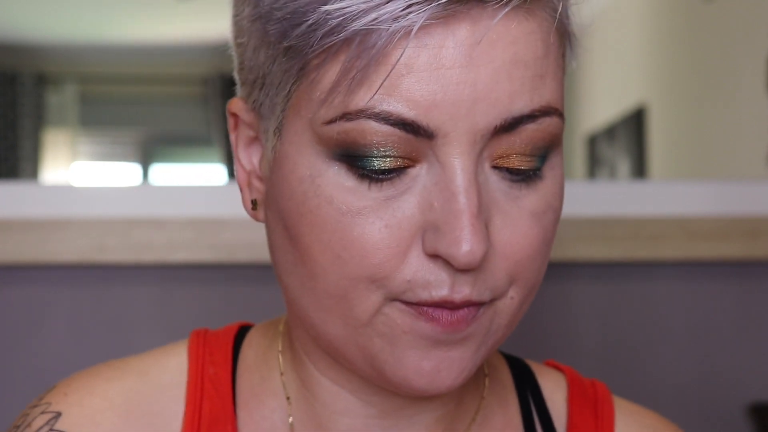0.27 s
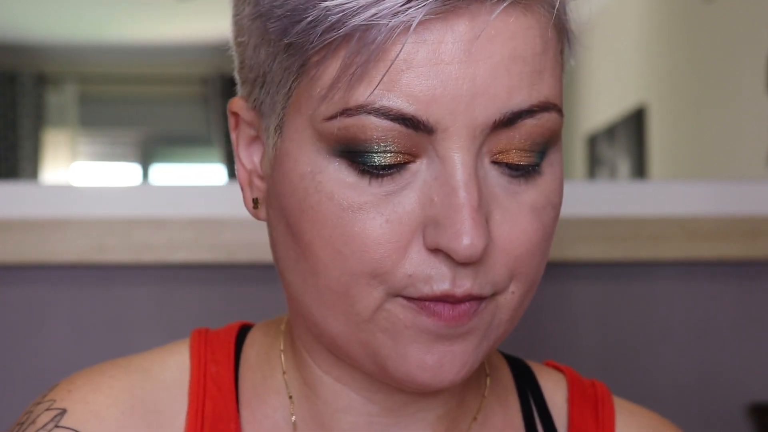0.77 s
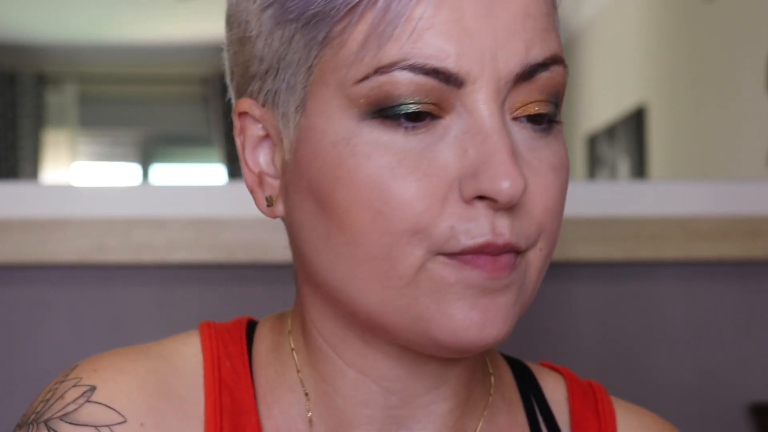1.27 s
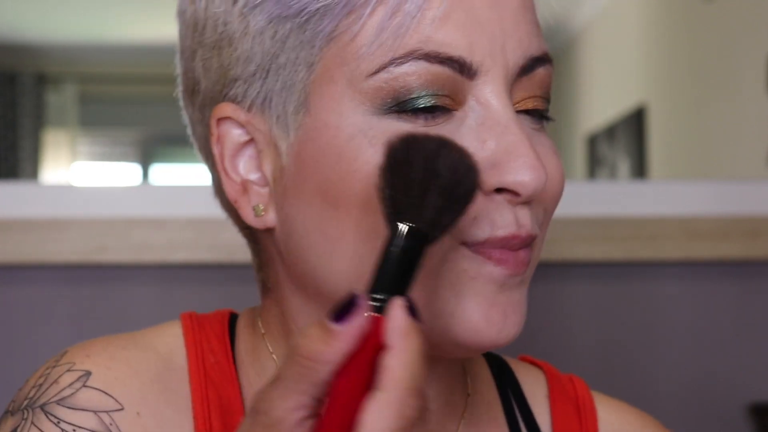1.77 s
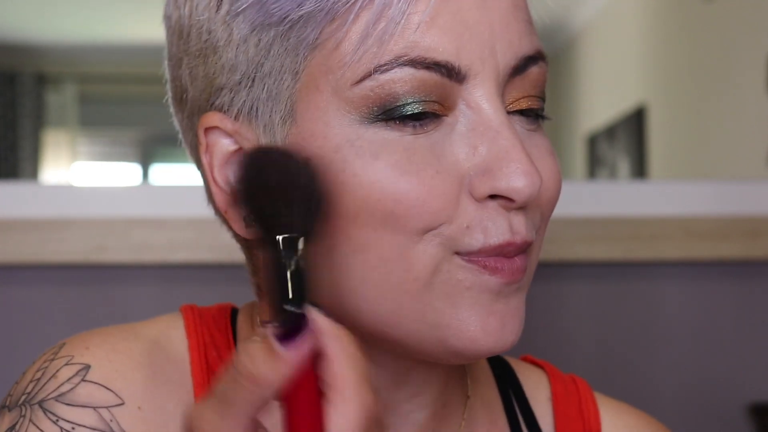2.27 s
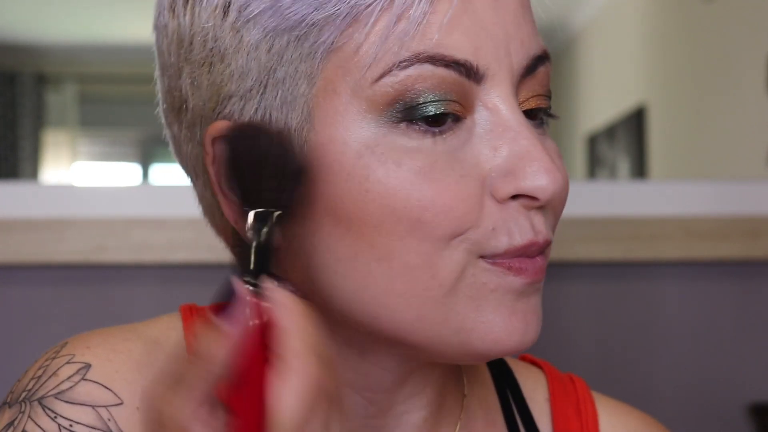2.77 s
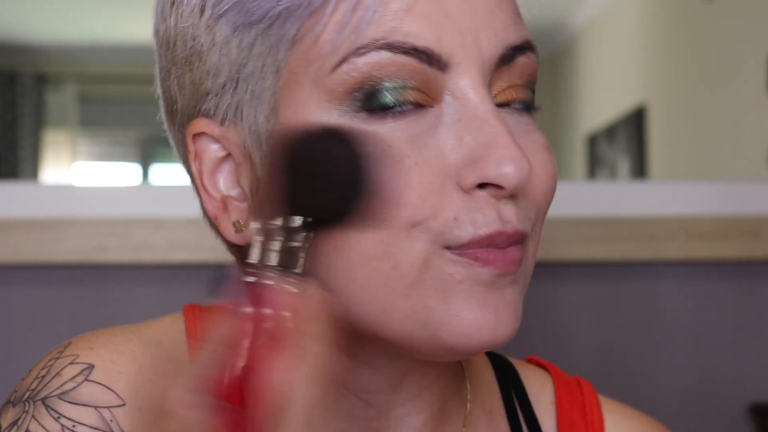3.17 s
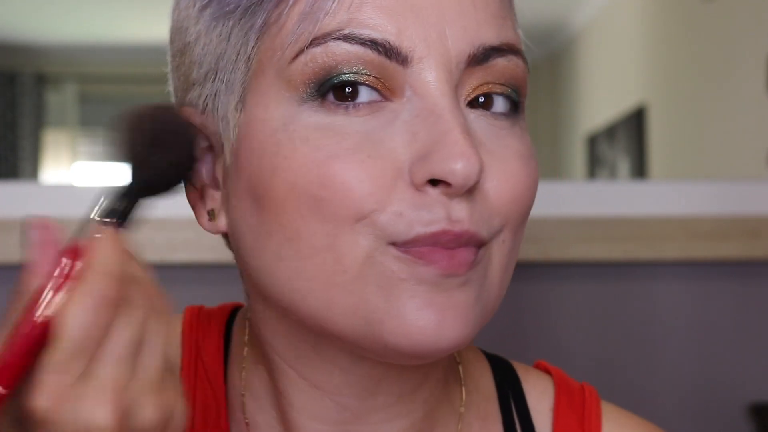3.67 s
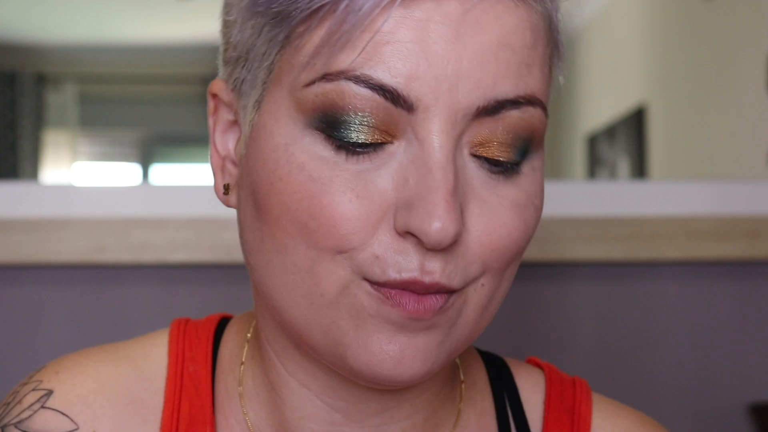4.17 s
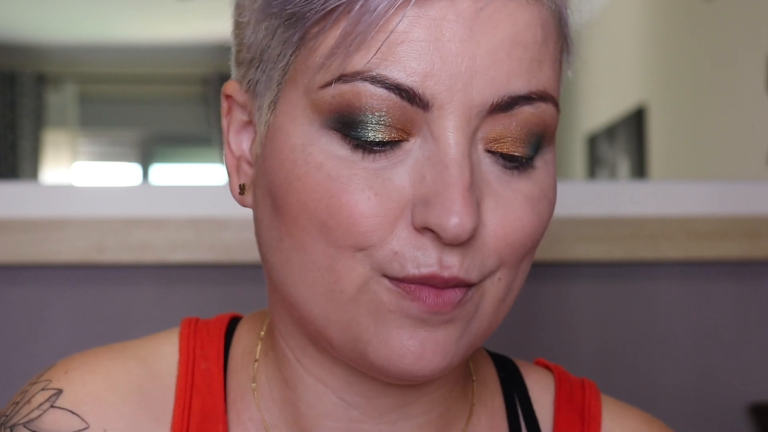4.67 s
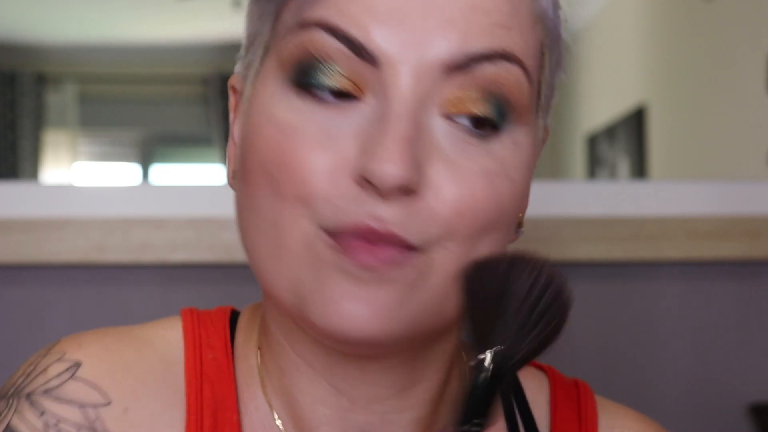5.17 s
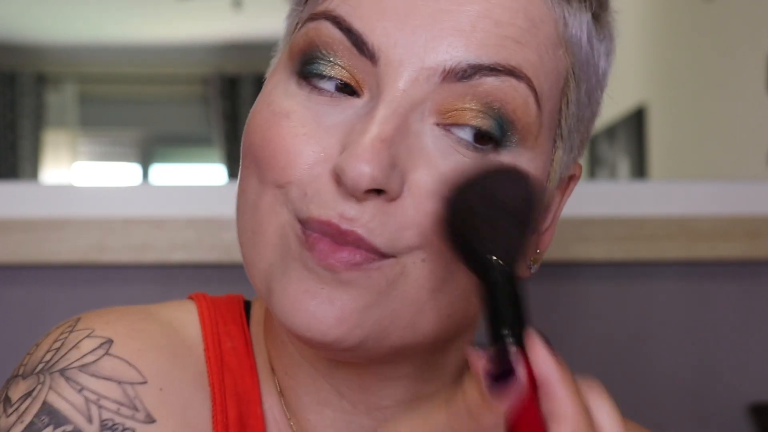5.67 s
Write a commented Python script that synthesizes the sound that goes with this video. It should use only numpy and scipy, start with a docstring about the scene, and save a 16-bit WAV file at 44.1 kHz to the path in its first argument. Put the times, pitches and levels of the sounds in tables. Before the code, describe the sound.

A make-up brush swirls faintly, is knocked twice hard on its case, then strokes a cheek while sparrows chirp outdoors over low distant engine hum.

```python
"""Under quiet room hiss, an engine hums far off; sparrows chirp outside and a make-up brush swirls in powder.
The brush is rapped twice on its hard case, then swept softly over a cheek, close to one microphone.
Hum, ringing case and birds are sums of sines; brush, rumble, street wash and echoes are shaped noise.
The two raps overload the recorder, whose limiter ducks and lets the room's echo swell back."""
import sys
import numpy as np
from scipy import signal
from scipy.fft import rfft, irfft, next_fast_len
from scipy.io import wavfile
from scipy.ndimage import map_coordinates

SR = 44100
rng = np.random.default_rng(int(sys.argv[2]) if len(sys.argv) > 2 else 0)


def store_pcm(level_fs):
    """Save levels as 16-bit WAV."""
    pcm = np.round(np.clip(level_fs, -1, 1) * 32767).astype(np.int16)
    wavfile.write(sys.argv[1], SR, np.atleast_2d(pcm).T)


N = 260631


def amp(db):
    """Turn decibels into a gain."""
    return 10 ** (np.asarray(db) / 20)


def unit(x):
    """Scale to an rms of 1."""
    return x / np.sqrt(np.mean(x ** 2) + 1e-20)


def along(points, hz):
    """Read a curve of (Hz, value) points at any frequency, with frequency on a log axis."""
    f, v = np.transpose(points)
    return np.interp(np.log(hz + 1), np.log(f + 1), v)


def wobble(rate, n):
    """Draw a smooth random curve of n samples through `rate` random points a second."""
    knots = rng.standard_normal(int(n * rate / SR) + 4)
    return map_coordinates(knots, [np.arange(n) * rate / SR])


def filtered(x, response):
    """Colour x by multiplying its spectrum with a gain for each frequency."""
    n = x.shape[-1]
    m = next_fast_len(n + 8192)  # silence added at the end, so that little wraps round
    spectrum = rfft(x, m) * response(np.fft.rfftfreq(m, 1 / SR))
    return irfft(spectrum, m)[..., :n]


def add(track, s, sound):
    """Mix a sound into a track from time s."""
    i = max(round(s * SR), 0)
    part = track[i:i + len(sound)]
    part += sound[:len(part)]


def air():
    """Steady noise gives rumble and microphone hiss; a wash of street noise swells as a car goes by."""
    # colour of the steady noise, relative: f/Hz, level/dB per Hz
    floor_colour = [(12, -53), (20, -2), (44, -1.5), (76, -15), (171, -4.5), (208, -12.5), (260, -5.5),
                    (308, -12), (568, -17.5), (730, -16), (2780, -25.5), (3380, -21), (5440, -22.5),
                    (5910, -27), (15700, -35)]
    floor = unit(filtered(rng.standard_normal(N), lambda hz: amp(along(floor_colour, hz))))
    # colour of the street noise, relative: f/Hz, level/dB
    street = [(300, -61), (480, 2.5), (600, 5), (700, -1.5), (1000, -7.0), (1500, -7.5), (2200, -42)]
    wash = unit(filtered(rng.standard_normal(N), lambda hz: amp(along(street, hz))))
    nearest_s, spread_s, lift_db = 2.76, 0.61, 2  # the passing car
    car_db = lift_db / (1 + ((np.arange(N) / SR - nearest_s) / spread_s) ** 2)
    waver_db = 1.5 * wobble(5, N)
    return amp(-48.5) * floor + amp(-57 + car_db + waver_db) * wash


def traffic():
    """A far engine's firing pulses make multiples of one rate, slowing at last; drones come and go."""
    # distant engine: t/s, firing rate f/Hz, lowest order level/dB, upper orders level/dB
    engine = [(0.0, 25.42, -49, -56), (0.532, 26.38, -56, -55.5), (0.692, 26.32, -53, -58),
              (1.1, 26.66, -50, -67), (1.5, 25.7, -47, -52.5), (1.68, 25.81, -58.5, -54.5),
              (2.78, 26.3, -55.5, -74.5), (3.06, 26.1, -65, -66), (3.54, 26.2, -57.5, -68),
              (4.45, 25.8, -52, -58), (5.01, 25.93, -48.5, -57), (5.26, 25.03, -53.5, -57.5),
              (5.76, 23.4, -47, -67), (5.91, 21.4, -63, -79)]
    # strength of each multiple of the firing rate: multiple, level/dB added to the one above
    orders = [(2, -1.5), (3, -2.5), (4, -1), (7, -6), (9, -6)]
    # swells of traffic drone: middle t/s, length t/s, f/Hz, level/dB at the middle
    drones = [(0.2, 1.1, 161, -56.5), (0.7, 0.75, 181.8, -57), (1.068, 0.69, 132.1, -52.5),
              (1.206, 1.1, 267.8, -58), (2.6, 0.84, 267.2, -58.5), (2.86, 1.17, 160.6, -53.5),
              (2.949, 0.8, 135, -60.5), (3.51, 1.1, 263, -55), (5.2, 1.85, 30.8, -48.5)]
    t = np.arange(N) / SR
    times, rates, low_db, upper_db = np.transpose(engine)
    rate_hz = np.interp(t, times, rates) + 0.14 * wobble(5.7, N)
    turn = 2 * np.pi * np.cumsum(rate_hz) / SR
    hum = np.zeros(N)
    for k, db in orders:
        drift_db = np.interp(t, times, upper_db if k > 2 else low_db)
        hum += amp(db + drift_db + 0.91 * wobble(2.95, N)) * np.cos(k * turn)
    out = np.sqrt(2) * hum  # so that levels are rms
    for s, length, hz, db in drones:
        start = max(s - length / 2, 0)
        n = int((s + length / 2 - start) * SR)
        u = start + np.arange(n) / SR
        swell = amp(db + 0.7 * wobble(6.2, n)) * np.cos(np.pi * (u - s) / length)
        tone = np.sin(2 * np.pi * hz * u + 0.5 * wobble(3.35, n))
        add(out, start, np.sqrt(2) * swell * tone)
    return out


def whistle(length, start_hz, end_hz, rough, taper):
    """A gliding sine of rms 1; short falling ones drop fast and level off, rough ones flutter more."""
    n = int(length * SR)
    u = np.arange(n) / n
    quick_fall = end_hz < start_hz and length < 0.06
    glide = 1 - (1 - u) ** 1.703 if quick_fall else u
    pitch = start_hz + (end_hz - start_hz) * glide + rough * 450 * wobble(900, n)
    swell = signal.windows.tukey(n, taper) * amp((1.5 + 0.64 * rough) * wobble(284, n))
    return unit(swell * np.sin(2 * np.pi * np.cumsum(pitch) / SR))


def chirp(s, db, lead_db, high_db, fall_db, high_ratio, top_ratio, before, after):
    """A sparrow's chirp is a run of quick glides; a facing wall sends its loud arch back twice."""
    # The four parts share their columns: t/s from the start of the arch, length t/s, start f/Hz, end f/Hz,
    # level/dB, roughness 0-1. Each chirp then changes times, pitches and levels.
    lead_in = [(-0.117, 0.0254, 3310, 3590, -16.5, 0.12), (-0.094, 0.0227, 3650, 3875, -8.5, 0.08),
               (-0.079, 0.0135, 3755, 5320, -9, 0.34)]  # swings up
    high_notes = [(-0.069, 0.036, 5240, 5380, -9, 0.29), (0.032, 0.0254, 5440, 5470, -13.5, 0.12)]  # one before the arch, one last of all
    drop = [(-0.043, 0.025, 5800, 3200, -6, 0.13)]  # a steep fall into the arch
    arch = [(0.001, 0.025, 3335, 4252, 0, 0.21), (0.026, 0.018, 4173, 3220, -2, 0.076)]  # the loud rise and fall
    slap_s, slap_db, slap_loss_db = 0.105, -11, 6  # wall: delay per trip, first level, loss on the next
    slap_blur = 0.085  # roughness gained on each trip
    notes = []
    for part, lift_db, ratio in (lead_in, lead_db, 1), (high_notes, high_db, high_ratio), (drop, 0, 1):
        for offset, length, start_hz, end_hz, level, rough in part:
            stretch = before if offset < 0 else after
            glide = (start_hz * ratio, end_hz * ratio)
            notes.append((s + offset * stretch, length * stretch, *glide, db + lift_db + level, rough))
    for offset, length, start_hz, end_hz, level, rough in arch:
        rising = end_hz > start_hz
        glide = (start_hz, end_hz * top_ratio) if rising else (start_hz * top_ratio, end_hz)
        note_db = db + level + (0 if rising else fall_db)
        for trip, wall_db in enumerate([0, slap_db, slap_db - slap_loss_db]):
            start = s + offset * after + trip * slap_s
            notes.append((start, length * after, *glide, note_db + wall_db, rough + trip * slap_blur))
    return notes


def syllables():
    """List every bird note as (s, length s, start Hz, end Hz, dB, roughness), before outdoor colouring."""
    # chirps: arch t/s, level/dB, lead-in lift level/dB, high notes lift level/dB, arch's fall lift level/dB,
    # pitch ratio of the high notes, pitch ratio of the arch's top, time stretch before the arch,
    # time stretch from the arch on
    calls = [(0.122, -53, 0, 6, -2, 1.01, 0.85, 0.75, 0.79),
             (0.462, -38.5, -2, -4.5, -2.5, 1, 1.03, 1.05, 0.95),
             (2.006, -41, 1, 3, -0.5, 1.015, 0.97, 0.97, 1.26),
             (2.443, -37.5, -2.5, -3.5, 0, 1, 1.02, 1.18, 1.05),
             (2.939, -52.5, -3, 6, 2.5, 1.01, 0.93, 0.96, 0.85),
             (4.228, -52, -13, 6, 2, 0.97, 0.99, 0.95, 1.05),
             (4.893, -40.5, 0.5, 4, -7, 0.955, 0.96, 0.86, 1.15),
             (5.55, -56.5, -11, 8.5, 1, 1.03, 0.97, 0.75, 1)]
    # thin whistles of a farther bird, all creeping upward: t/s, length t/s, start f/Hz, level/dB
    thin_notes = [(1.505, 0.025, 5480, -52.5), (1.687, 0.19, 5490, -67), (2.095, 0.047, 5580, -54),
                  (2.219, 0.12, 5920, -65), (2.928, 0.25, 5760, -66.5), (3.323, 0.12, 5670, -62),
                  (3.841, 0.048, 4970, -57), (5.648, 0.039, 5385, -60)]
    thin_rise_hz_per_s, thin_rough = 1400, 0.303
    # harsh scolding notes: t/s, length t/s, start f/Hz, end f/Hz, level/dB
    rasps = [(3.133, 0.135, 4710, 3124, -52), (3.387, 0.08, 4070, 4550, -58.5),
             (3.884, 0.1, 3875, 4670, -57.5), (5.86, 0.066, 4840, 4550, -51)]
    rasp_rough = 0.68
    notes = [note for row in calls for note in chirp(*row)]
    for s, length, hz, db in thin_notes:
        notes.append((s, length, hz, hz + thin_rise_hz_per_s * length, db, thin_rough))
    return notes + [(*rasp, rasp_rough) for rasp in rasps]


def echo(x, build_s):
    """Diffuse echo as fading noise: it builds up, then each frequency dies at its own speed."""
    # time to die away by 60 dB: f/Hz, t/s
    decay = [(200, 0.54), (1500, 0.47), (4200, 0.6), (8400, 0.42), (14000, 0.38)]
    hz, t, z = signal.stft(rng.standard_normal(int(SR * 0.7)), SR, nperseg=256)
    shape = amp(-60 * t / along(decay, hz)[:, None]) * (1 - np.exp(-t / build_s))
    tail = signal.istft(z * shape, SR, nperseg=256)[1]
    return signal.fftconvolve(x, tail / np.linalg.norm(tail))[:len(x)]


def sparrows():
    """Notes come clear through the window gap, and again as a blurred, brighter wash from walls outside."""
    song, scattered = np.zeros(N), np.zeros(N)
    for s, length, start_hz, end_hz, db, rough in syllables():
        blur = 0.5 * abs(np.log(end_hz / start_hz))  # wide glides blur most
        add(song, s, amp(db) * whistle(length, start_hz, end_hz, rough, taper=0.48))
        add(scattered, s, amp(db) * whistle(length, start_hz, end_hz, rough + blur, taper=0.071))
    # colouring by each path: f/Hz, level/dB
    gap = [(2900, 4), (3250, -2.0), (3550, 4.0), (3850, 1.5), (4400, -7), (5000, 0.0), (5400, 1.5), (6300, 0)]
    walls = [(2600, -0.5), (3200, -1), (3700, -3), (4500, 1.5), (5400, 0.5), (6500, 8.5)]
    direct = filtered(song, lambda hz: amp(along(gap, hz)))
    wash = echo(filtered(scattered, lambda hz: amp(along(walls, hz))), build_s=0.0029)
    return direct + wash


def strokes():
    """The hand keeps an even beat through each run: list (middle s, half length s, dB, bright Hz)."""
    # runs of strokes: middle of the first t/s, middle of the last t/s, half a stroke's length t/s,
    # level/dB of the first before its swell, bright region f/Hz
    brushing = [(0.40, 0.80, 0.1, -54, 11100), (1.96, 1.965, 0.14, -56, 11400),
                (2.27, 3.95, 0.125, -58.5, 11620), (4.437, 4.85, 0.091, -59, 10600),
                (5.235, 5.234, 0.13, -55.5, 8400), (5.588, 5.849, 0.14, -54, 10700)]
    period_s = 0.24  # nearest beat that fits the run
    fade_db = 0.1  # each stroke of a run is a little lighter
    beats = []
    for first, last, half_s, db, bright_hz in brushing:
        count = round(abs(last - first) / period_s) + 1
        for k, s in enumerate(np.linspace(first, last, count)):
            beats.append((s, half_s, db - k * fade_db, bright_hz))
    return beats


def brush():
    """Slipping bristles are flickering noise: a fine, broad hiss that swells and fades with each sweep."""
    hiss = np.zeros(N)
    for s, half_s, db, bright_hz in strokes():
        n = int(2 * half_s * SR)
        slips = rng.standard_normal(n) * amp(2.0 * wobble(310, n))
        # f/Hz, level/dB
        colour = [(1000, -15), (bright_hz * 0.85, -8), (bright_hz, 0),
                  (bright_hz * 0.96, -1), (bright_hz * 1.45, -13)]
        sweep = np.hanning(n) ** 2.5
        rustle = unit(filtered(slips, lambda hz: amp(along(colour, hz))))
        add(hiss, s - half_s, amp(db - 0.5) * sweep * rustle)
    return hiss


def raps():
    """A hard crack rings the short-lived modes of handle and case; near surfaces and the room answer."""
    # raps of the handle on the case: t/s, level/dB, f/Hz favoured by the point of contact, its lift level/dB
    knocks = [(1.161, 1.5, 1507, 4), (1.3807, 2, 3940, 6)]
    # ringing tones of handle and case: f/Hz, level/dB before the rap's own, time to fall by 60 dB t/s
    modes = [(197, -35, 0.018), (507, -19, 0.049), (566, -19.5, 0.043), (797, -9.5, 0.022),
             (1290, -11.5, 0.028), (1619, -3, 0.019), (2660, -14.5, 0.022), (3250, -14.5, 0.019),
             (4020, -7, 0.009), (4496, -9, 0.015), (5250, -28, 0.011), (7200, -17, 0.011),
             (8230, 1.5, 0.01), (8460, 3, 0.0078), (8740, -2.5, 0.019), (9800, -4, 0.0034),
             (11900, -10, 0.0079), (13360, -1.5, 0.0059), (15030, -13, 0.0052)]
    # reflections from near surfaces: delay t/s, level/dB
    reflections = [(.004, -9), (.0051, -26), (.0067, -16.5), (.0086, -19.5), (0.012, -24), (0.016, -36)]
    # what the case radiates into the room: f/Hz, level/dB
    radiated = [(200, -22), (480, 4.5), (780, 4), (1100, -6.5), (1620, 6), (2100, -1), (3300, -5.5),
                (4300, 1.5), (6400, -8.5), (7700, -0.5), (8350, 9), (9600, -4), (13300, -2.5), (15000, -10)]
    out = np.zeros(N)
    t = np.arange(int(SR * 0.8)) / SR
    contact = signal.unit_impulse(len(t))
    for s, db, contact_hz, contact_db in knocks:
        def favour(hz):
            """The struck point lifts the tones around one frequency (dB)."""
            return contact_db * np.exp(-(np.log((hz + 1) / contact_hz) / 0.12) ** 2)

        ring = np.zeros(len(t))
        for k, (hz, level, t60) in enumerate(modes):
            fade = amp(level + favour(hz) - 60 * t / t60)
            ring += (-1) ** k * fade * np.sin(2 * np.pi * hz * t)  # neighbours start in opposite directions
        crack = amp(-2.0 - 60 * t / 0.014) * rng.standard_normal(len(t))
        blow = amp(db) * (ring + crack + amp(3.5) * contact)
        room = filtered(echo(contact, build_s=0.017), lambda hz: amp(along(radiated, hz) + favour(hz)))
        add(out, s, blow + amp(db + 3.5) * room)
        for delay, wall_db in reflections:
            add(out, s + delay, amp(wall_db) * blow)
    return signal.sosfilt(signal.butter(8, 15000, fs=SR, output="sos"), out)


def scene():
    """One microphone feeds both channels; a little independent noise in each makes it very slightly wide."""
    # colour of each channel's faint noise: f/Hz, level/dB per Hz, before the overall cut
    side_noise_colour = [(30, -9.5), (300, 6.5), (1000, 2.5), (3000, -4.5), (8000, 2.5), (15000, 5.5)]
    mono = raps() + brush() + sparrows() + traffic() + air()
    side_noise = filtered(rng.standard_normal((2, N)), lambda hz: amp(along(side_noise_colour, hz)))
    return mono + amp(-63.5) * side_noise


def limiter(x, ceiling_db, release_s):
    """Gain drops quickly on a peak and recovers exponentially."""
    t = np.arange(N) / SR
    over = np.log(np.maximum(np.abs(x).max(axis=0) / amp(ceiling_db), 1))
    # hold each excess while it decays, until a larger one takes over
    held = np.exp(np.maximum.accumulate(np.log(over + 1e-12) + t / release_s) - t / release_s)
    pole = np.exp(-1 / (0.00037 * SR))  # attack of 0.37 ms
    return x * np.exp(-signal.lfilter([1 - pole], [1, -pole], held))


def record(dry):
    """The recorder limits, clips peaks that slip past the limiter, and cuts the highest treble."""
    loud = np.clip(limiter(dry, ceiling_db=-1.0, release_s=0.046), -1, 1)
    return filtered(loud, lambda hz: np.clip((16000 - hz) / 400, 0, 1))  # fades out from 15600 to 16000 Hz


dry = scene()
out = record(dry)
store_pcm(out)
```